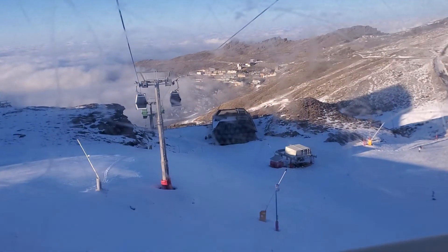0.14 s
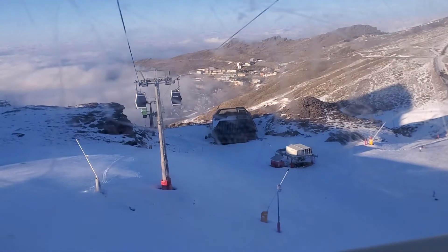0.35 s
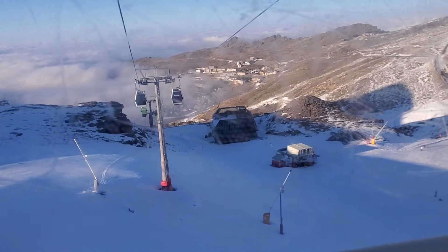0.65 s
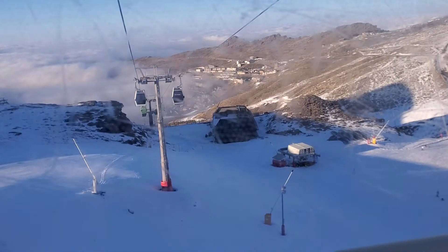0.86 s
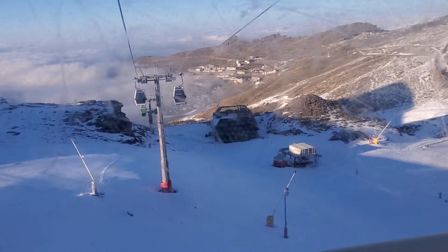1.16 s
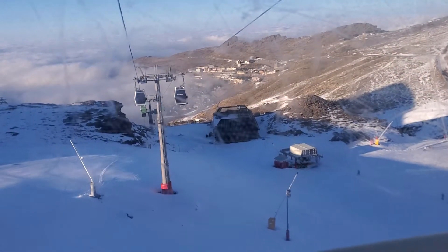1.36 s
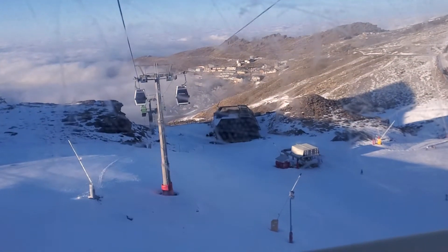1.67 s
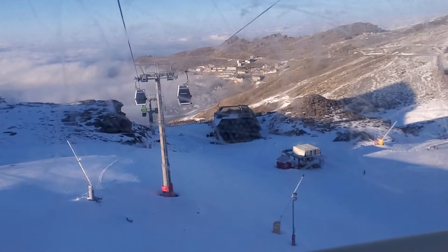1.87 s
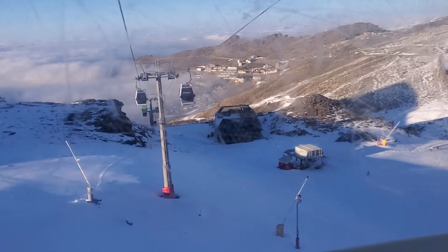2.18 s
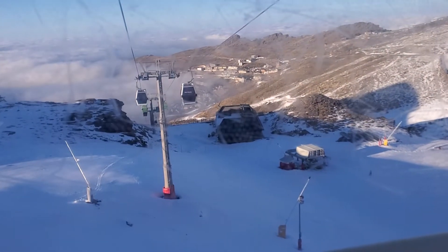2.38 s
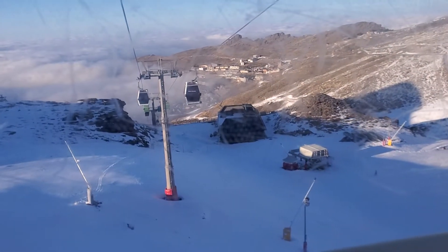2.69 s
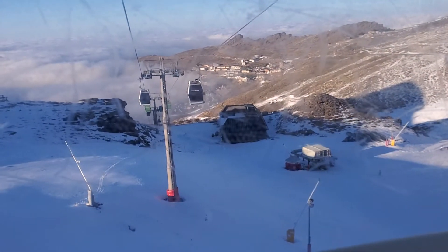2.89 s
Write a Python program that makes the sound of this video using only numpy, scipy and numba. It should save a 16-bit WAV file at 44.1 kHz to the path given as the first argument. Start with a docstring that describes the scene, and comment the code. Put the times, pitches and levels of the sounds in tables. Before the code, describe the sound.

A low, wavering cable-car cabin drone and soft airy hiss run throughout, heard from inside in wide stereo. From 0.2 s a stiff jacket rubs in grainy bursts, with a thin swish and faint squeaks until 0.8 s, another squeak near 1.2 s. Tiny ticks fall between 0.9 and 2 s. Deep heaves and muffled knocks strengthen from 1.4 s; a brighter, louder sleeve swish slides downward from 2.6 s.

```python
"""Inside a gliding cable-car cabin, 3 s: shell drone (wandering sine, 77-93 Hz), panel resonances and soft hiss
(filtered noise) run throughout. From 0.2 s a stiff jacket rubs in bursts of grainy noise; the first sleeve
swish (gliding noise band) and thin squeaks (narrow noise) come before 0.8 s, a third squeak at 1.2 s. Ticks
(damped sines) fall at 0.9-2 s. From 1.4 s the floor heaves harder near 32 Hz and soft knocks lift the cabin
ring; a second, higher swish glides down from 2.6 s. Two microphone ports hear it all."""
import sys
import numpy as np
from scipy import signal
from scipy.fft import rfft, irfft
from scipy.io import wavfile
from scipy.ndimage import uniform_filter1d
from numba import njit

SR = 44100
rng = np.random.default_rng(int(sys.argv[2]) if len(sys.argv) > 2 else 0)


def level_to_linear(level):
    """Convert decibel levels to linear amplitude factors, elementwise."""
    exponent = np.asarray(level, float) / 20
    return 10 ** exponent


def materialize(psi):
    """Save the field psi as 16-bit PCM at rate SR to the path in sys.argv[1].

    A 1-D psi becomes a single channel; in a 2-D psi each row is a channel.
    """
    bounded = np.clip(np.atleast_2d(psi).T, -1, 1)
    quanta = np.round(bounded * 32767).astype(np.int16)
    wavfile.write(sys.argv[1], SR, quanta)


N = 133623


def over_hz(table, hz, index=1):
    """Column read on a log-frequency axis."""
    rows = np.array(table, float)
    return np.interp(np.log(np.maximum(hz, 1)), np.log(rows[:, 0]), rows[:, index])


def over_s(table, index=1):
    """Column read along time."""
    rows = np.array(table, float)
    return np.interp(np.arange(N) / SR, rows[:, 0], rows[:, index])


def unit(x):
    """Scale to rms 1."""
    return x / np.sqrt(np.mean(x ** 2))


def walk(rate_hz):
    """Random levels of about unit rms, held 1 / rate_hz s and slewed twice."""
    hold = int(SR / rate_hz)
    steps = np.repeat(rng.standard_normal(N // hold + 1), hold)
    return 1.38 * uniform_filter1d(uniform_filter1d(steps, hold), hold)[:N]


def stroke(start_s, length_s):
    """Rise, hold and fall of one cloth stroke, 0-1."""
    rise, hold_end = 0.21, 0.52  # shares of the length
    corners_s = start_s + length_s * np.array([0, rise, hold_end, 1])
    return np.interp(np.arange(N) / SR, corners_s, [0, 1, 1, 0])


@njit
def svf(x, hz, width):
    """State-variable band-pass with a moving centre, gain 1 there."""
    y, band, low = np.empty(len(x)), 0., 0.
    for i in range(len(x)):
        g, k = np.tan(np.pi * hz[i] / SR), width / hz[i]
        v = (band + g * (x[i] - low)) / (1 + g * (g + k))
        band, low, y[i] = 2 * v - band, low + 2 * g * v, k * v
    return y


def ring(hz, width_hz):
    """Two unrelated noises, each twice through one resonance (width per pass), rms 1."""
    centre_hz, width_hz = hz * np.ones(N), float(width_hz)
    noises = rng.standard_normal((2, N))
    return unit(np.array([svf(svf(x, centre_hz, width_hz), centre_hz, width_hz) for x in noises]))


def panel(table, hz, wander, rate_hz, shake_share):
    """Panel swinging as a sine of wandering pitch, plus unsteady shaking as narrow noise."""
    pitch_hz = hz * (1 + wander * walk(rate_hz))
    level = uniform_filter1d(level_to_linear(over_s(table)), size=600)
    shake = ring(hz, np.mean(hz) * 0.3)
    swing = np.sqrt(2) * np.sin(2 * np.pi * np.cumsum(pitch_hz) / SR)
    side_db = -7  # shaking in the second view
    return level * np.array([swing + shake_share * shake[0], level_to_linear(side_db) * shake[1]])


def drone():
    """Cabin shell swinging as a panel whose mean pitch drifts and jumps."""
    # swing level: t/s, level/dB
    drone_level = [(0.0, -24), (0.05, -38.5), (0.1, -29), (0.24, -31), (0.34, -25.5), (0.45, -42),
                   (0.48, -27.5), (0.59, -51), (0.63, -28.5), (0.67, -44), (1.23, -38), (1.4, -49.5),
                   (1.49, -32), (1.87, -47.5), (1.9, -31.5), (2.18, -35.5), (2.51, -31), (2.58, -39),
                   (2.63, -31.5), (2.75, -40.5), (2.8, -26.5), (2.84, -39), (2.91, -25.5), (3.0, -35.5),
                   (3.03, -58)]
    # mean pitch: t/s, f/Hz
    drone_pitch = [(0, 82.3), (.28, 81.7), (.36, 78.3), (.52, 78.8), (.6, 92.6), (.82, 92.8), (.9, 82),
                   (2.1, 78.96), (2.2, 90), (2.5, 76.95), (3.03, 77.26)]
    return panel(drone_level, over_s(drone_pitch), wander=0.014, rate_hz=11.87, shake_share=0.29)


def heave():
    """Floor panel swinging at about 32 Hz, harder when jolted."""
    # swing level: t/s, level/dB
    heave_level = [(0.0, -42), (0.22, -50), (0.56, -42), (0.83, -55), (1.33, -49), (1.41, -34), (1.44, -48),
                   (1.54, -34), (1.57, -41.5), (1.72, -34), (1.75, -20.5), (1.84, -21), (1.94, -35.5),
                   (2.03, -32), (2.43, -36.5), (2.46, -25.5), (2.63, -21), (2.7, -44), (2.94, -32.5),
                   (3.03, -39)]
    return panel(heave_level, 32, wander=0.029, rate_hz=8, shake_share=0.73)


def cabin():
    """Noise held in air and panel resonances fed by rope vibration; wall knocks lift the upper ones."""
    # resonances: f/Hz, width per pass/Hz, level/dB
    resonances = [(63.2, 21.5, -43.5), (97.4, 14.3, -42), (110.6, 16.7, -44.5), (146.3, 11, -51.5),
                  (188.9, 13.8, -54.5), (220.6, 13.2, -56), (247.2, 9.4, -57.5), (275.4, 18, -57.5),
                  (328, 50, -63), (404.8, 20.5, -63), (599, 64, -66.5)]
    # soft wall knocks: t/s, added ring over the steady one/dB, before rise and decay
    knocks = [(1.489, 19.5), (1.92, 7), (2.63, 10), (2.9, 10)]
    rise_s, t60_s, knock_from_hz = 0.051, 0.39, 165
    t = np.arange(N) / SR
    lift = np.ones(N)
    for start_s, db in knocks:
        since_s = np.maximum(t - start_s, 0)
        decay = np.exp(-np.log(1000) * since_s / t60_s)
        lift += level_to_linear(db) * (1 - np.exp(-since_s / rise_s)) * decay
    return sum(level_to_linear(db) * ring(hz, width_hz) * (lift if hz > knock_from_hz else 1)
               for hz, width_hz, db in resonances)


def noise_bands():
    """Air and cloth noise of one rippled colour, split in third octaves: (Hz, air, cloth)."""
    # spectrum of air and rope hiss through the shell: f/Hz, relative level per Hz/dB
    spectrum = [(125, -5), (160, -13.5), (260, -14.5), (600, -18.5), (1020, -22.5), (1590, -25.5),
                (2330, -26.5), (2900, -22), (3500, -27), (4420, -31), (6000, -30), (7650, -30.5),
                (8500, -39), (9650, -41), (11500, -38), (15600, -40.5)]
    ripple_db, ripple_hz, hiss_db = 1.4, 30, -49  # ripple: dense high cabin modes; hiss before swell
    f = np.fft.rfftfreq(N, 1 / SR)
    ripple = unit(uniform_filter1d(rng.standard_normal(len(f)), int(ripple_hz * N / SR)))
    colour = level_to_linear(over_hz(spectrum, f) + ripple_db * ripple) * (f > 120)
    air, cloth = (rfft(rng.standard_normal((2, N))) * colour for _ in range(2))
    scale = level_to_linear(hiss_db) / np.std(irfft(air, N))
    bands = []
    for hz in 125 * 2 ** np.arange(0, 7.1, 1 / 3):
        octaves_off = np.abs(np.log2(np.maximum(f, 1) / hz))
        mask = scale * np.sqrt(np.clip(1 - 3 * octaves_off, 0, 1))  # overlaps sum in power
        bands.append((hz, irfft(air * mask, N), irfft(cloth * mask, N)))
    return bands


def grain():
    """Dense fibre snaps of uneven size, each decaying, as a rough gain of rms 1."""
    snaps_per_s, decay_s, spread_db = 1200, 0.002, 1.5
    snaps = (rng.random(N) < snaps_per_s / SR) * level_to_linear(spread_db * rng.exponential(size=N))
    return unit(signal.lfilter([1], [1, -np.exp(-1 / (decay_s * SR))], snaps) + 2)


def rubs(bands):
    """Stiff jacket rubbing: grainy noise bursts, each with its own spectrum."""
    # spectrum points of a rub: f/Hz
    rub_hz = (350, 1100, 2800, 6500, 12000)
    # rubs: start/s, length/s, then level over the unswelled hiss/dB at each of rub_hz
    rub_rows = [(.22, 0.24, -14, 2, 1.5, 4.5, -16), (.48, 0.23, -0.5, 0, -22, -24, -19),
                (.76, 0.15, -18, 2.5, -4, -4, -15), (1.03, 0.14, -14, -15, 3, -24, 0),
                (1.22, 0.2, 6.5, -0.5, 3, -12, -2), (1.344, 0.11, 1.5, 4, 5.5, -1, -1),
                (1.419, 0.044, 9, -3, -3, 2, 2), (1.481, 0.082, 16, 7, 12, 4.5, 5.5),
                (1.759, 0.042, -19, -10, 3.5, -1, 0.5), (1.9, 0.11, 7, 5, 3.5, -9, -10),
                (1.984, 0.076, -18, 6.5, 5, 3.5, -2), (2.138, 0.045, -26, 2, -4, 9.5, 8.5),
                (2.521, 0.15, 9, 8, 5, -1, -2), (2.61, 0.2, 6.5, 8, 6, 1, 5),
                (2.86, 0.081, 9.5, 1.5, -27, -2, -8), (2.931, 0.076, 2, 9, 5.5, -5, -13)]
    thin_below_hz = 204
    shapes = np.array([np.sin(np.pi / 2 * stroke(row[0], row[1])) ** 2 for row in rub_rows])
    rough, out = grain(), 0
    for hz, _, cloth in bands:
        levels_db = [np.interp(np.log(hz), np.log(rub_hz), row[2:]) for row in rub_rows]
        lift = level_to_linear(levels_db) @ shapes
        lift = lift * min(hz / thin_below_hz, 1) ** 0.78 * level_to_linear(0.97 * walk(29.65))
        out = out + lift * rough * cloth
    return out


def swishes():
    """Cloth sliding on cloth: a gliding noise band, broad air around it, thin whistles where it crosses them."""
    # two sleeve swishes, each: t/s, band level/dB, centre f/Hz
    paths = [
        [(.17, -61.5, 5350), (.29, -54, 4750), (.36, -51, 5270), (.46, -57, 5300), (.72, -60, 5300)],
        [(2.62, -60, 8900), (2.67, -57.5, 7800), (2.72, -47.5, 7000), (2.8, -46, 6320), (2.86, -44.5, 6007),
         (2.91, -47.5, 5460), (2.96, -58, 5000)],
    ]
    # band width of each swish: width/Hz
    widths_hz = (1150, 2300)
    # thin weave whistles: f/Hz
    weave_hz = (4650, 5300, 5970, 6600, 7050)
    weave_width_hz, weave_db, weave_reach_hz = 36, -11, 500
    air_width_hz, air_db = 4520, -3.5
    patch_db, patch_rate_hz = 2, 35  # unevenness of each strip
    fade_s = 0.031
    out = 0
    for rows, width_hz in zip(paths, widths_hz):
        centre_hz = over_s(rows, index=2)
        start_s, end_s = rows[0][0], rows[-1][0]
        fade = over_s([(start_s - fade_s, 0), (start_s, 1), (end_s, 1), (end_s + fade_s, 0)])
        band = unit(sum(level_to_linear(patch_db * walk(patch_rate_hz)) * ring(centre_hz + k * width_hz / 3, width_hz / 2)
                        for k in (-1, 0, 1)))
        whistles = 0
        for hz in weave_hz:
            nearness = 1 / (1 + ((hz - centre_hz) / weave_reach_hz) ** 4)
            whistles = whistles + level_to_linear(2.0 * walk(13)) * ring(hz, weave_width_hz) * nearness
        body = band + level_to_linear(weave_db) * whistles + level_to_linear(air_db) * ring(centre_hz, air_width_hz)
        out = out + fade * level_to_linear(over_s(rows) + walk(40.5)) * body
    return out


def squeaks():
    """Cloth on a smooth surface: narrow noise tones of wavering level that swell and fade."""
    # squeaks: start/s, length/s, level/dB, f/Hz
    squeak_rows = [(0.203, 0.5, -58, 5600), (.59, 0.12, -58, 5590), (1.245, 0.13, -60, 3620)]
    return sum(stroke(start_s, length_s) * level_to_linear(db + 1.7 * walk(23.625)) * ring(hz, width_hz=29)
               for start_s, length_s, db, hz in squeak_rows)


def ticks():
    """Zip or seam ticking: short damped sines, alike in both views."""
    # ticks: t/s, initial amplitude/dB, f/Hz
    tick_rows = [(0.8605, -42.5, 2510), (1.068, -39.5, 2840), (1.349, -33, 2710), (1.4984, -33, 2336),
                 (1.495, -34.5, 2820), (1.9943, -38, 2590)]
    t60_s = 0.017
    out, t = np.zeros(N), np.arange(2000) / SR
    decay = np.exp(-np.log(1000) * t / t60_s)
    for start_s, db, hz in tick_rows:
        i = int(start_s * SR)
        out[i:i + len(t)] += level_to_linear(db) * np.sin(2 * np.pi * hz * t) * decay
    return out


def hiss(bands):
    """Air and rope hiss through the shell: noise bands that swell slowly and flicker one by one."""
    # slow swell: t/s, low level/dB (x1.5 up to 2 kHz, x0.5 from 8 kHz), high level/dB (x0 to x1 over 2-8 kHz)
    swell_rows = [(0, 0.5, -5), (.25, -1, -2.5), (.8, 1.5, -0.5), (1.3, -0.5, 1.5), (1.7, -1, 1.5),
                  (2.3, 1.5, 0.5), (3.03, 4, 0.5)]
    low_db, high_db = over_s(swell_rows), over_s(swell_rows, index=2)
    shared, out = walk(7.45), 0
    for hz, air, _ in bands:
        up = np.clip(np.log2(hz / 2000) / 2, 0, 1)
        swell_db = (1.5 - up) * low_db + up * high_db
        out = out + level_to_linear(swell_db + 0.24 * shared + 1.64 * walk(8.9)) * air
    return out


def scene():
    """Two views of the sound field, unrelated but for shared levels and the ticks."""
    bands = noise_bands()
    shell = drone() + heave() + cabin()
    jacket = rubs(bands) + swishes() + squeaks() + ticks()
    return shell + jacket + hiss(bands)


def low_pass(x):
    """Removes everything above the highest recorded frequency."""
    return signal.sosfilt(signal.butter(12, 16760, fs=SR, output="sos"), x)


def record(dry):
    """Two ports: alike in the bass, mostly unlike in the treble, the right louder at about 2-12 kHz."""
    # port likeness: f/Hz, likeness/0-1, phase lead of the left/rad
    ports = [(40.4, 1, 0.32), (100, 1, 0.14), (154, 0.91, 0.06), (255, 0.7, 0.3), (665, 0.45, -2),
             (1430, 0.54, -2.5), (2840, 0.41, -5.5), (7400, 0.16, -3.5), (15500, 0.23, -5.5)]
    # level balance: f/Hz, left over right/dB
    balance = [(60, -1), (200, 0.5), (380, 3), (700, -3.5), (1290, -0.5), (2380, -2), (4400, -10),
               (7800, -8), (9500, -8.5), (15000, 1)]
    top_hz = 15740
    f = np.fft.rfftfreq(N, 1 / SR)
    first, second = rfft(dry) * (f < top_hz)
    like = np.clip(over_hz(ports, f), 0, 1)
    turn = np.exp(1j * over_hz(ports, f, index=2))
    lean = level_to_linear(over_hz(balance, f) / 2)
    left = (like * first * turn + np.sqrt(1 - like ** 2) * second) * lean
    right = first / lean
    return low_pass(irfft(np.array([left, right]), N))


dry = scene()
out = record(dry)
materialize(out)
```